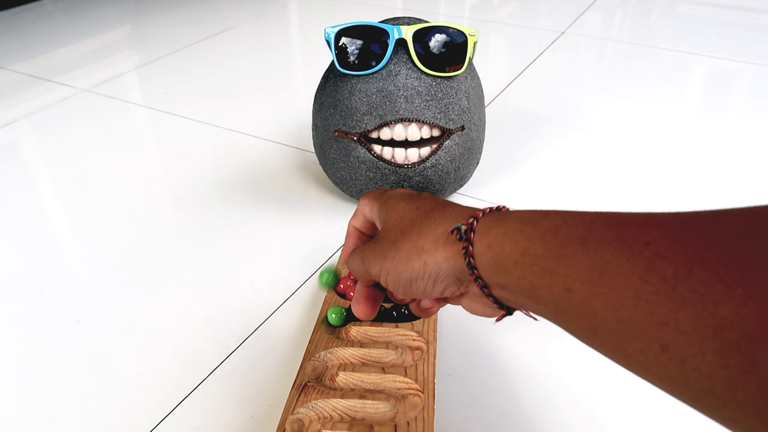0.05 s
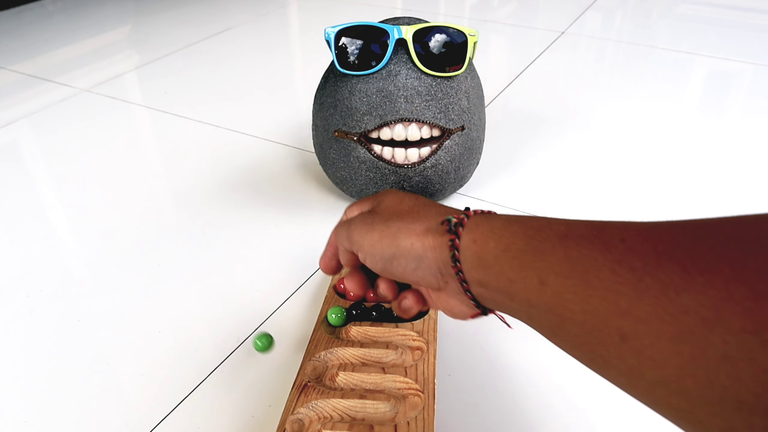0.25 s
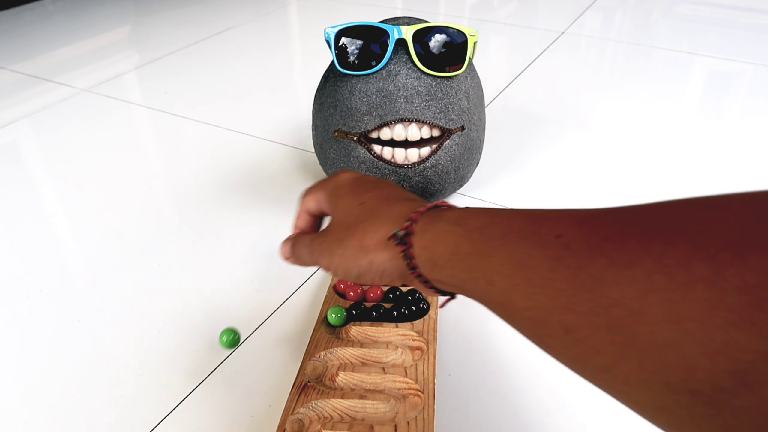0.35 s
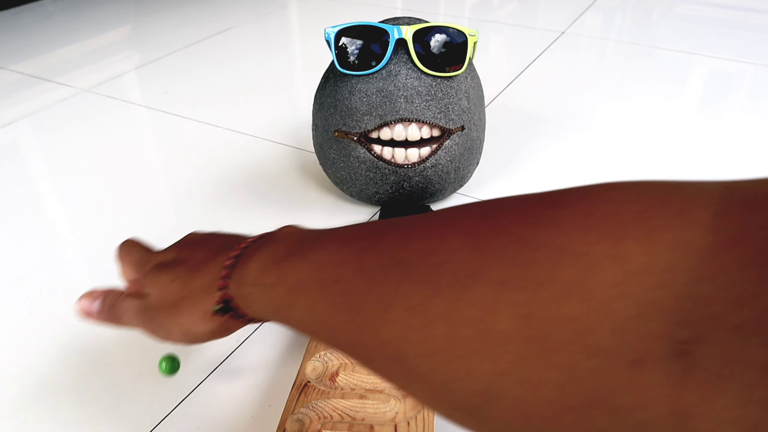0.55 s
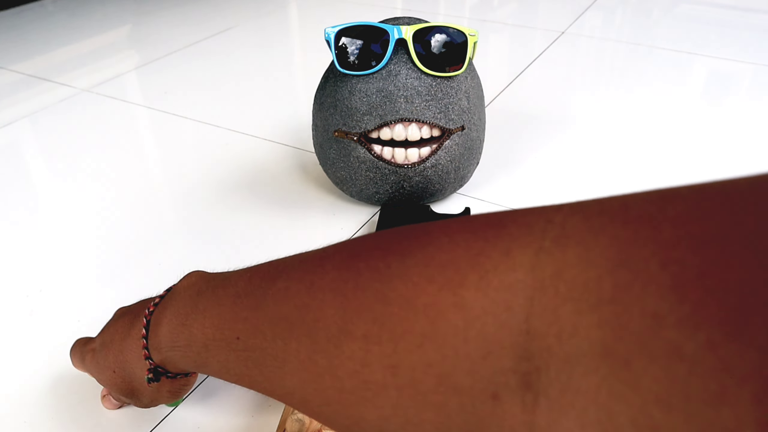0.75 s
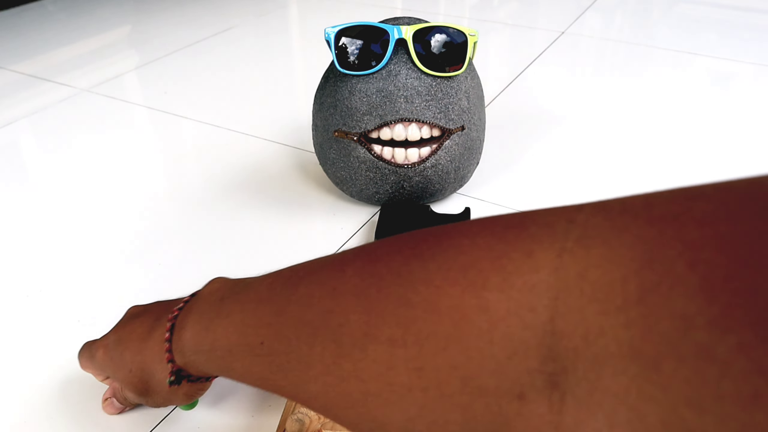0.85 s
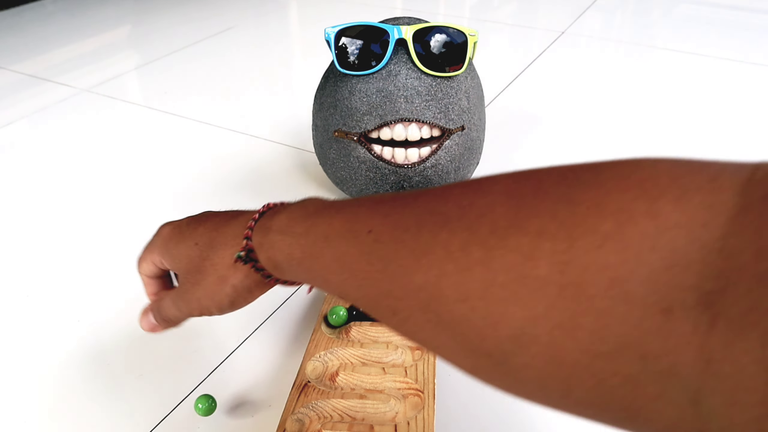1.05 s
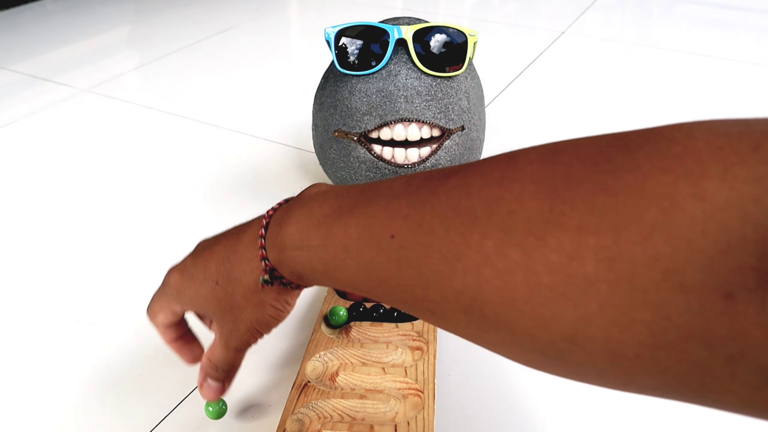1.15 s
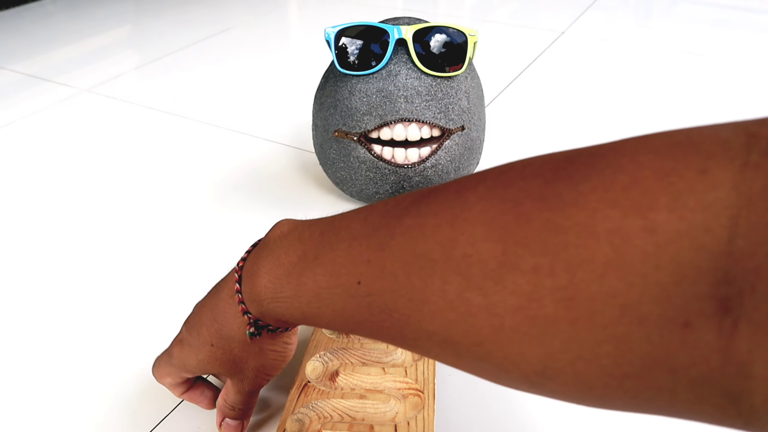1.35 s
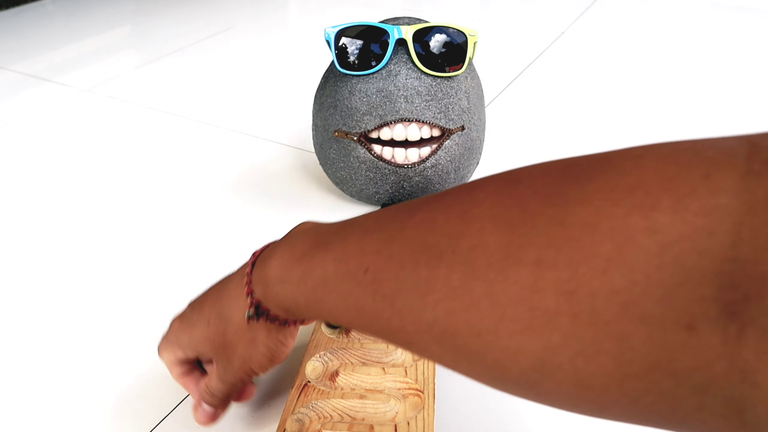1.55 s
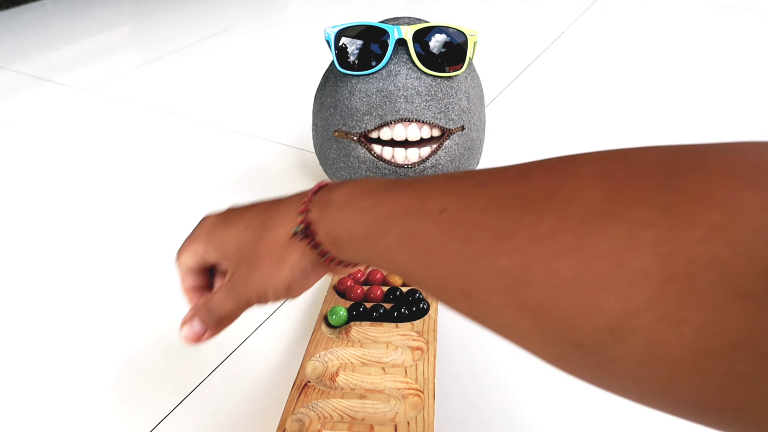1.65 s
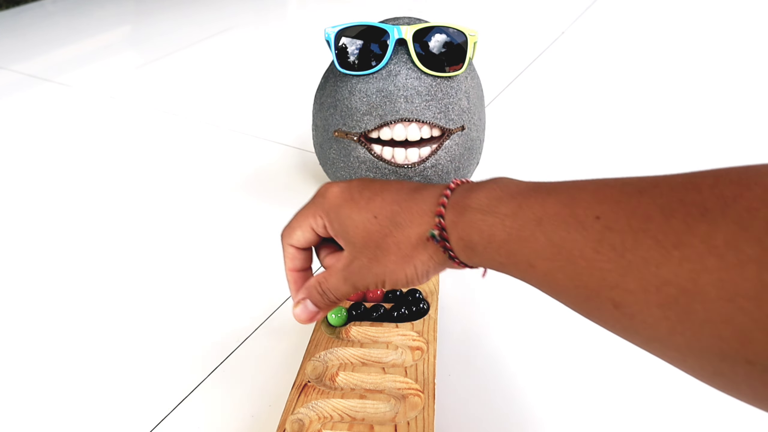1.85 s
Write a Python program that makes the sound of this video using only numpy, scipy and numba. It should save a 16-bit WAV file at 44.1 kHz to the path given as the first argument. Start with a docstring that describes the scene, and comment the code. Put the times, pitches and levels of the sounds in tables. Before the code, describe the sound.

A marble bounces on tiles after one loud crack against wood, its sharp clicks speeding up until a hand bumps down softly. It is heard up close in a bare room, over a low hum and far-off chirping.

```python
"""A far-off chirp and a faint tick over room air, then a glass marble knocks on a wooden game board.
The knock is a crack plus short wooden modes; the marble hops across a tiled floor in ever smaller bounces,
each a bright click that sets the bare room ringing. A hand bumps down softly, and the bird whistles
upward glides over a low hum. A close microphone pair hears it through a limiter that ducks after the knock."""
import sys
import numpy as np
from scipy import signal
from scipy.fft import rfft, irfft
from scipy.io import wavfile
from numba import njit

SR = 44100
rng = np.random.default_rng(int(sys.argv[2]) if len(sys.argv) > 2 else 0)


def inscribe(sig):
    """Save sig as 16-bit PCM at rate SR to the path in sys.argv[1].

    A 1-D sig is mono; a 2-D sig holds one channel per row.
    Samples are clipped to [-1, 1] before scaling.
    """
    pcm = np.round(np.clip(np.atleast_2d(sig).T, -1, 1) * 32767)
    wavfile.write(sys.argv[1], SR, pcm.astype(np.int16))


N = 83790
T = np.arange(N) / SR
F = np.fft.rfftfreq(2 * N, 1 / SR)

# modes of the wooden board: f/Hz, level/dB, t60/s
BOARD_MODES = [(1050, -17, 0.045), (1156.5, -6, 0.0496), (1245.2, -6.5, 0.044), (1492, -5.5, 0.0667),
               (1543.6, -7, 0.1084), (1634, -20.5, 0.1), (1952.4, -4.5, 0.05), (2013.5, -0.5, 0.028),
               (2327, 0.5, 0.0169), (2710, 2.5, 0.0136), (2659, -8.5, 0.041), (3317, -10.5, 0.0356),
               (3803, -4.5, 0.0275), (4124, -15, 0.053)]
# EQ of the contact on wood: f/Hz, level/dB
CRACK_EQ = [(40, -12), (250, -13.5), (500, -24.5), (860, -33.5), (1120, -1.5), (2800, 6), (4200, -3.5),
            (5500, -24), (8000, -18), (12000, -22), (15500, -53)]
# what the whole board radiates into the room: f/Hz, level/dB
BOARD_SEND_EQ = [(100, -36), (780, -10.5), (1100, 5.5), (1550, 6), (1750, -2), (1980, 5), (2300, -8.5),
                 (2680, 2.5), (2950, -9), (3250, -1.5), (3700, -17), (6000, -25.5), (14000, -45.5)]
KNOCK_S, KNOCK_PAN_DB = .2094, -3.5
RING_DB, CRACK_DB, BOARD_SEND_DB = 2, 25.5, 12
FAR_WALL_S, FAR_WALL_DB = 0.081, -9

# hits on the tile: t/s, level/dB, body/dB, clack/dB, glass/dB, top/dB, left over right/dB, room send/dB
BOUNCE_HITS = [(0.3335, 4, 2.5, -1.5, 1.5, 3.5, 7, -7), (0.5242, 3, 2.5, 3, 1.5, 6, 4.5, -8.5),
               (0.7019, -1.5, 4.5, 4.5, 2, 6, 2.5, -7), (0.8410, 3.5, 0.5, 2.5, -0.5, 5, 3.5, -15),
               (0.9364, -5.5, 0.5, 1, 7, 8.5, 3, -7), (1.0339, -2, -5, -3, -4.5, 4.5, 1.5, -13),
               (1.1296, -3, -2, -1, 1, 4, 1.5, -13), (1.2220, -3, -2, 2, 0, -2, 4, -12.5),
               (1.3116, -7, 1, 4.5, 5, 0.5, 3.5, -10), (1.398, -5, -0.5, 4.5, 2, -1, 3.5, -15),
               (1.4419, -9, 3, 1, 6.5, -5.5, 3, -8.5)]
SPOT_BANDS_HZ = (1700, 3900, 6500, 10500, 13000)  # body, clack, glass, main peak, top
# EQ of glass on tile: f/Hz, level/dB
CLICK_EQ = [(60, -22.5), (500, -16.5), (900, -17.5), (1400, -13), (1800, -24.5), (2450, -9.5), (2900, -26),
            (3600, -15), (4150, -5), (4900, -8.5), (6500, -6), (8000, -3.5), (10000, 3.5), (11500, 3.5),
            (13000, -13), (15500, -22.5)]
# EQ of the clicks as they reach the walls: f/Hz, level/dB
CLICK_SEND_EQ = [(100, -5.5), (1000, -8.5), (2500, -7.5), (4000, -6), (6500, -4), (8500, 0), (10000, 5),
                 (11800, 6), (13000, -1), (15500, -35)]
# slaps from nearby surfaces: delay/s, level/dB
EARLY_ECHOES = [(.0071, -16), (0.0176, -14), (0.021, -13)]
CLICK_DB, CLICK_RING_DB, CLICK_REVERB_DB = 11.5, -8, -2
SCATTER_DB, SCATTER_BUILD_S = -9.5, .00015

# soft bumps of the hand: t/s, rise/s, level/dB
HAND_BUMPS = [(1.322, 0.0309, -39), (1.546, 0.017, -50.5)]
# EQ of a bump: f/Hz, level/dB
BUMP_EQ = [(40, -27), (120, -16), (185, 3.5), (270, -9.5), (360, -4.5), (500, -18.5), (1000, -14.5),
           (2500, -39.5)]
# marbles shifting in the hand: t/s, level before the band filter/dB
MARBLE_TICKS = [(0.03, 8), (1.555, -6)]

# bird notes: t/s, length/s, first f/Hz, last f/Hz, level/dB, direct gain/dB, waver/share of pitch
BIRD_NOTES = [(-.04, 0.04475, 3700, 4754, -23.5, -10.5, 0.029),
              (0.416, 0.0785, 3490, 5037, -35.5, 2.5, 0.0082), (1.206, 0.0628, 3460, 4845, -41.5, -5, .015),
              (1.57, 0.04723, 3100, 3301, -44, 1.5, 0.044), (1.695, 0.08, 3504, 4913, -40, 2, 0.0031)]
BIRD_GLIDE_SHARE, BIRD_SWELL_SKEW = 0.79, 1.474
BIRD_ECHO_S, BIRD_ECHO_DB = .088, -10.5

# EQ of the room air: f/Hz, level/dB
AIR_EQ = [(20, -7), (60, -5.5), (115, -0.5), (150, -0.5), (280, -7.5), (500, -4), (850, -5.5),
          (1200, -11.5), (2200, -12.5), (4500, -15), (5600, -16.5), (11000, -18.5), (13000, -32.5),
          (15000, -43.5)]
# fader ride of the air: t/s, level/dB
AIR_RIDE = [(0, -39), (.2, -41), (.6, -44), (1.0, -50), (1.5, -50), (1.7, -47.5), (1.9, -49)]
# fader ride of a far-off midrange swell: t/s, level/dB
SWELL_RIDE = [(0, -49), (.2, -55), (1.55, -69), (1.7, -55.5), (1.83, -48), (1.9, -56.5)]
# tones of the room hum: f/Hz, level/dB
HUM_TONES = [(118, -62), (200, -57.5), (344, -68), (430, -68)]
HUM_DRIFT_SHARE = 0.02007

# reverb time of the room: f/Hz, t60/s
ROOM_DECAY = [(200, 0.193), (1300, 0.358), (3500, 0.442), (9000, 0.3086), (14000, 0.1875)]
ROOM_BUILD_S, ROOM_GRAIN_DB = 0.00456, 3.5
# phase between the microphones: f/Hz, lead of the left/rad
MIC_PHASE = [(100, 0), (1000, -.15), (1800, -.5), (2700, -.9), (3600, -1.8), (4400, -2.6), (5200, -3.7),
             (9000, -3.55), (14000, -3.3)]
# likeness of diffuse sound at the two microphones: f/Hz, coherence/0-1
MIC_COHERENCE = [(100, 0.99), (500, 0.69), (1500, 0.1), (4000, 0.07), (7000, 0.54), (11000, 0.69)]
THRESHOLD_DB, ATTACK_S, RELEASE_S, LOOK_AHEAD_S = 1.5, 0.000934, 0.0963, 0.00053
LOW_CUT_HZ, HIGH_CUT_HZ = 21.6, 15800


def knock(reverb):
    """Marble on wood: a crack and short modes; the board feeds the room and a far wall throws it back."""
    modes = sum(amp(db) * np.sin(2 * np.pi * hz * T) * fade(t60) for hz, db, t60 in BOARD_MODES)
    impulse = T == 0
    crack = filt(unit(impulse + burst(t60=0.009)), min_phase(CRACK_EQ))
    direct = (amp(CRACK_DB) * crack - amp(RING_DB) * modes) * pan(KNOCK_PAN_DB)
    wall_tail = unit(diffuse() * fade(t60=0.136))
    far_wall = amp(FAR_WALL_DB) * rfft(wall_tail, 2 * N) * delay(FAR_WALL_S)
    wet = filt(amp(BOARD_SEND_DB) * impulse, min_phase(BOARD_SEND_EQ) * (reverb + far_wall))
    return filt(direct + wet, delay(KNOCK_S))


def bounces(reverb):
    """Glass on tile: sharp clicks, coloured by each spot, scattered by arm and board, echoed by the room."""
    direct, send, noise = 0, 0, diffuse()
    glass_on_tile = min_phase(CLICK_EQ)
    scatter_envelope = (1 - np.exp(-T / SCATTER_BUILD_S)) ** 2 * fade(t60=.009)
    for s, db, body_db, clack_db, glass_db, top_db, pan_db, send_db in BOUNCE_HITS:
        start = round(s * SR)
        scatter = unit(np.roll(noise, -start, axis=1) * scatter_envelope)
        contact = unit((T == 0) + amp(CLICK_RING_DB) * burst(t60=.002) + amp(SCATTER_DB) * scatter)
        spot_eq = list(zip(SPOT_BANDS_HZ, (body_db, clack_db, glass_db, 0, top_db)))
        click = filt(unit(filt(contact, glass_on_tile)), amp(over_hz(spot_eq)) * delay(s))
        direct += click * amp(CLICK_DB + db) * pan(pan_db)
        send += amp(CLICK_DB + db + send_db) * (np.arange(N) == start)
    slaps = sum(amp(db) * delay(s) for s, db in EARLY_ECHOES)
    return direct + filt(send, min_phase(CLICK_SEND_EQ) * (slaps + amp(CLICK_REVERB_DB) * reverb))


def bird(reverb):
    """Sine whistles that glide up, swell and level off, washed in reverb with a late echo."""
    direct, send = 0, 0
    for s, length, first_hz, last_hz, db, direct_db, waver_share in BIRD_NOTES:
        progress = np.clip((T - s) / length, 0, 1)
        glide = np.minimum(progress / BIRD_GLIDE_SHARE, 1)
        waver = 1 + waver_share * wander(rate_hz=148)
        hz = (first_hz + (last_hz - first_hz) * glide) * waver
        envelope = np.sqrt(abs(np.sin(np.pi * progress ** BIRD_SWELL_SKEW)))
        note = amp(db) * envelope * sine(hz)
        direct += amp(direct_db) * note
        send += note
    return direct + filt(send, reverb * (1 + amp(BIRD_ECHO_DB) * delay(BIRD_ECHO_S)))


def hand():
    """Dull bumps that swell and fade as the hand comes down, and small ticks of marbles held in it."""
    pressure = 0
    for s, rise, db in HAND_BUMPS:
        age = np.maximum(T - s, 0) / rise
        pressure += amp(db) * age * np.exp(1 - age)
    tick_band = band(hz=4500, width_hz=830)
    ticks = sum(amp(db) * filt(burst(t60=0.036), delay(s) * tick_band) for s, db in MARBLE_TICKS)
    return pressure * diffuse(amp(over_hz(BUMP_EQ))) + ticks


def room_tone():
    """The bed: softly hissing air, a low hum that drifts in pitch and a far-off swell."""
    air = ride(AIR_RIDE) * diffuse(amp(over_hz(AIR_EQ)))
    hum = 0
    for hz, db in HUM_TONES:
        drift = 1 + HUM_DRIFT_SHARE * wander(rate_hz=5.265)
        hum += amp(db) * np.sqrt(2) * sine(hz * drift)
    swell = ride(SWELL_RIDE) * diffuse(band(hz=817, width_hz=82.5))
    return air + hum + swell


def room_reverb():
    """Frequency response of the bare room: a grainy tail that builds up and rings longest in the mids."""
    noise, tail = diffuse(), 0
    for centre_hz, t60 in ROOM_DECAY:
        crossover = over_hz([(hz, hz == centre_hz) for hz, _ in ROOM_DECAY])
        tail += filt(noise, crossover) * fade(t60)
    grain = amp(ROOM_GRAIN_DB * wander(rate_hz=350))
    build_up = 1 - np.exp(-T / ROOM_BUILD_S)
    return rfft(unit(tail * grain * build_up), 2 * N)


def amp(db):
    """Decibels to gain."""
    return 10 ** (np.asarray(db) / 20)


def pan(db):
    """Stereo gains with the left louder by db."""
    return amp([[db / 2], [-db / 2]])


def ride(rows):
    """Gain over time from fader points in dB."""
    return amp(np.interp(T, *np.array(rows, float).T))


def over_hz(rows):
    """Straight lines on a log-frequency axis."""
    hz, value = np.array(rows, float).T
    return np.interp(np.log(F + 1), np.log(hz), value)


def filt(x, response):
    """Apply a frequency response."""
    return irfft(rfft(x, 2 * N) * response)[..., :N]


def unit(x):
    """Scale to unit energy."""
    return x / np.sqrt(np.sum(x ** 2, axis=-1, keepdims=True))


def min_phase(eq):
    """Unit-energy response of an EQ curve, with no pre-ring."""
    cepstrum = irfft(np.log(amp(over_hz(eq))))
    cepstrum[1:N] *= 2
    cepstrum[N + 1:] = 0
    response = np.exp(rfft(cepstrum))
    return response / np.sqrt(np.mean(abs(response) ** 2))


def band(hz, width_hz):
    """Resonant peak, 6 dB down at width_hz to either side."""
    return 1 / (1 + ((F - hz) / width_hz) ** 2)


def delay(s):
    """Response of a delay by whole samples."""
    return np.exp(-2j * np.pi * F * round(s * SR) / SR)


def fade(t60):
    """Decay by 60 dB in t60 seconds."""
    return np.exp(-np.minimum(np.log(1000) * T / t60, 60))


def sine(hz):
    """Oscillator that follows a pitch curve."""
    return np.sin(2 * np.pi * np.cumsum(hz) / SR)


def burst(t60):
    """Decaying noise of unit energy."""
    return unit(rng.standard_normal(N) * fade(t60))


def diffuse(colour=1):
    """Coloured noise of rms 1, partly alike at the two microphones."""
    coherence = over_hz(MIC_COHERENCE)
    mid, side = filt(rng.standard_normal((2, N)), colour * np.sqrt([1 + coherence, 1 - coherence]))
    return unit(np.array([mid + side, mid - side])) * np.sqrt(N)


def wander(rate_hz):
    """Random modulator of rms 1 that rolls off above rate_hz."""
    return diffuse(band(0, rate_hz))[0]


@njit
def follow(x, attack, release):
    """Level detector that rises fast and falls slowly."""
    out, level = np.empty(len(x)), 0.
    for i in range(len(x)):
        level += (x[i] - level) * (attack if x[i] > level else release)
        out[i] = level
    return out


def scene():
    """All sources in one room, with the phase offset of the microphone pair."""
    reverb = room_reverb()
    mix = knock(reverb) + bounces(reverb) + bird(reverb) + hand() + room_tone()
    phase = over_hz(MIC_PHASE) * np.array([[.5], [-.5]])
    return filt(mix, np.exp(1j * phase))


def record(dry):
    """A look-ahead limiter ducks after loud peaks, the rest clips, and the sub bass and top are cut."""
    level = follow(abs(dry).max(axis=0), 1 / (ATTACK_S * SR), 1 / (RELEASE_S * SR))
    level_ahead = np.interp(T + LOOK_AHEAD_S, T, level)
    reduction = np.maximum(level_ahead / amp(THRESHOLD_DB), 1)
    limited = np.clip(dry / reduction, -1, 1)
    low_cut = signal.butter(1, LOW_CUT_HZ, "highpass", fs=SR, output="sos")
    high_cut = signal.ellip(8, .2, 70, HIGH_CUT_HZ, fs=SR, output="sos")
    return signal.sosfilt(high_cut, signal.sosfilt(low_cut, limited))


dry = scene()
out = record(dry)
inscribe(out)
```